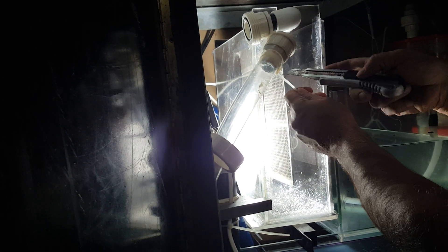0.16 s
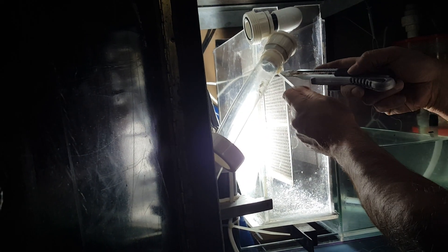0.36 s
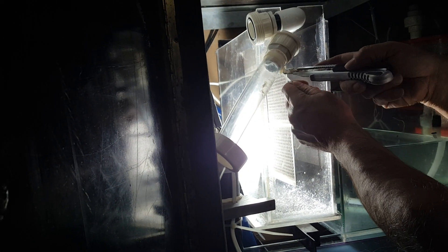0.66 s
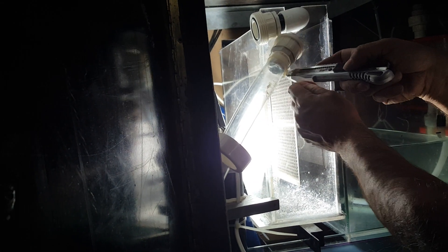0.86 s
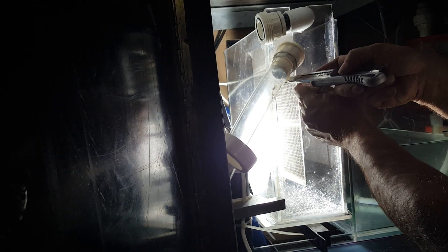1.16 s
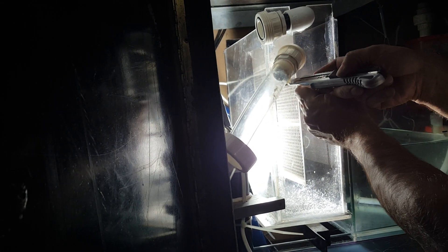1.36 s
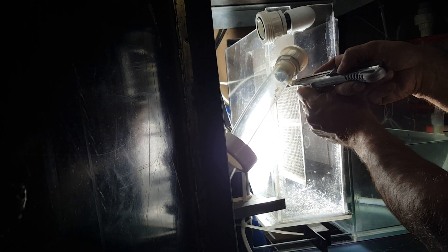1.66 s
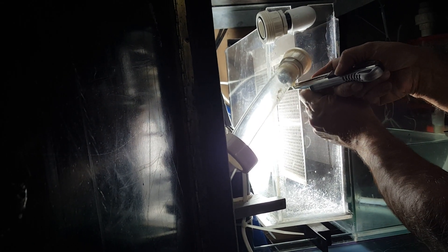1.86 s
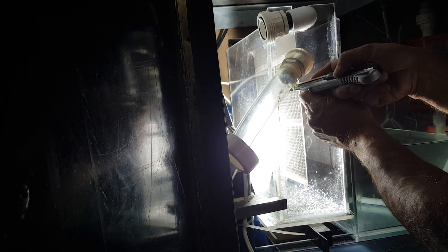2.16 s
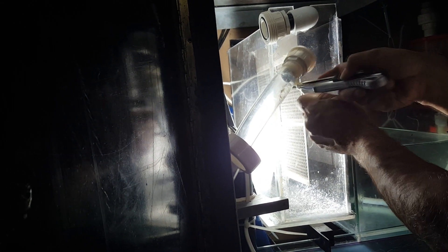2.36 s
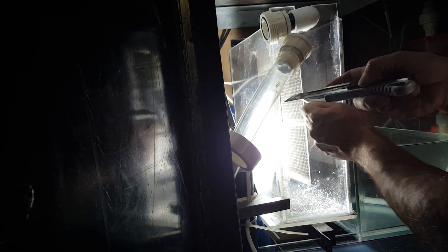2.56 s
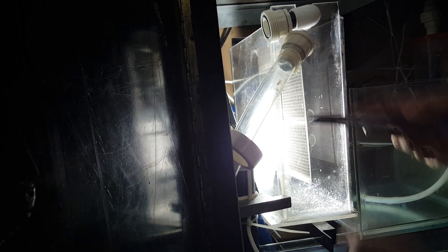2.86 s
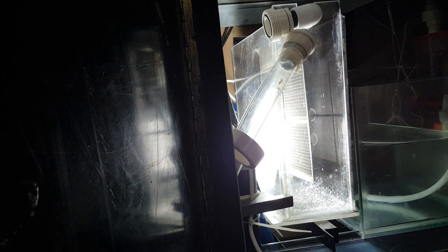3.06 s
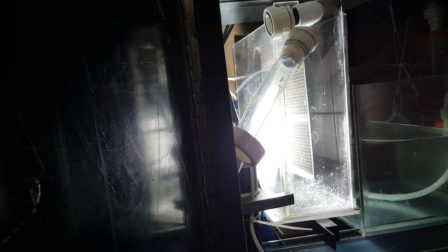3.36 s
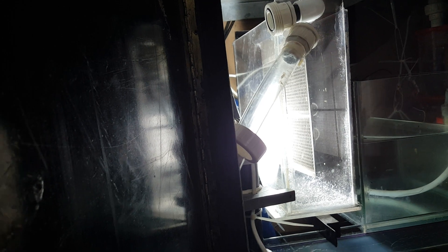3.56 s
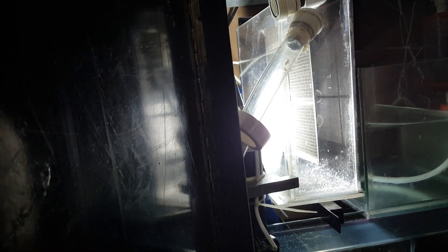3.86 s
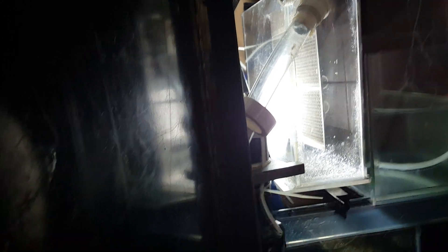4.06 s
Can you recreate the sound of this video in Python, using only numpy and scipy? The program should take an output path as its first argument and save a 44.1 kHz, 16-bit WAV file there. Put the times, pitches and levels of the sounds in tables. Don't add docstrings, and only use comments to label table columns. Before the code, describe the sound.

Steel cutters click several times on a plastic tie, snap through it loudly, then the tool rattles quickly over a steady pump hum.

```python
import sys
import numpy as np
from scipy import signal
from scipy.fft import rfft, irfft, next_fast_len
from scipy.io import wavfile
from scipy.ndimage import uniform_filter1d, map_coordinates

SR = 44100
rng = np.random.default_rng(int(sys.argv[2]) if len(sys.argv) > 2 else 0)


def put_to_file(sound):
    columns = np.atleast_2d(sound).T
    safe = np.clip(columns, -1, 1)
    whole_steps = np.round(safe * 32767)
    wavfile.write(sys.argv[1], SR, whole_steps.astype(np.int16))


def linear_from_db(decibels):
    return 10 ** (np.asarray(decibels, float) / 20)


N = 186047

# centre in Hz, width in Hz, level in dB.
NEAR_MODES = [
    [(7060, 1920, -2.5), (8580, 2000, 0)],
    [(1957, 520, 2), (3070, 1300, -4)],
    [(3437, 1040, 0), (4525, 1490, -2.5)],
    [(6330, 1180, 0)],
    [(10540, 6500, -2), (14040, 4300, 2)],
]
# centre in Hz, width in Hz, level in dB.
FAR_MODES = [
    [(8050, 2100, 0)],
    [(2210, 800, -0.019), (2990, 1000, -0.7)],
    [(3240, 910, -0.2), (5070, 1600, -2)],
    [(6050, 1800, 0)],
    [(10770, 2500, 0), (14450, 2100, 0)],
]
# jaw in dB, its share of heft, blade in dB, its shares of heft and snap.
RATTLE_FOLLOW = (-2.5, 0.43, -0.9, 0.5, 0.4)


def unit(x):
    return x / np.sqrt(np.mean(x ** 2) + 1e-20)


def along(points, hz):
    f, v = np.transpose(points)
    return np.interp(np.log(hz + 1), np.log(f + 1), v)


def wobble(rate_hz):
    knots = rng.standard_normal(int(N * rate_hz / SR) + 4)
    return map_coordinates(knots, [np.arange(N) * rate_hz / SR])


def filtered(x, response):
    n = x.shape[-1]
    m = next_fast_len(n + 4096)
    return irfft(rfft(x, m) * response(np.fft.rfftfreq(m, 1 / SR)), m)[..., :n]


def resonant(modes, order=2, shift=1):
    def response(f):
        one = 0
        for k, (centre_hz, width_hz, db) in enumerate(modes):
            damping = 1j * f * width_hz
            peak = damping / ((shift * centre_hz) ** 2 - f * f + damping)
            one = one + (-1) ** k * linear_from_db(db / order) * peak
        return one ** order / np.sqrt(np.mean(np.abs(one) ** (2 * order)))
    return response


def two_ports(n, share):
    a, b = rng.standard_normal((2, n))
    turn = np.arccos(np.clip(share, -1, 1)) / 2
    common, opposed = np.cos(turn) * a, np.sin(turn) * b
    return np.array([common + opposed, common - opposed])


def add(out, start_s, x):
    part = out[:, round(start_s * SR):][:, :x.shape[1]]
    part += x[:, :part.shape[1]]


def cabinet(x, wet_db, delay_s):
    # frequency in Hz, t60 in seconds.
    decay = [(500, 0.31), (2000, 0.51), (4000, 0.47), (8000, 0.32), (14000, 0.28)]
    hz, t, z = signal.stft(rng.standard_normal((2, SR // 2)), SR, nperseg=256)
    dying = z * linear_from_db(-60 * t / along(decay, hz)[:, None])
    tail = signal.istft(dying, SR, nperseg=256)[1]
    tail = np.pad(tail, ((0, 0), (round(delay_s * SR), 0)))
    return linear_from_db(wet_db) * signal.fftconvolve(x, tail / np.linalg.norm(tail[0]), axes=1)


def rush(spectrum, patchy_db):
    # frequency in Hz, side minus mid in dB.
    side_width = [(60, -27), (110, -18), (200, -18.5), (380, -10), (700, -2), (1290, 0.5), (2380, 2),
                  (4400, -0.5), (8120, 0.5), (15000, 0.5)]
    z = signal.stft(rng.standard_normal((2, N)), nperseg=512)[2]
    field = uniform_filter1d(rng.standard_normal(z.shape[1:]), 5, 0)
    field = uniform_filter1d(field, 10, 1)
    pair = signal.istft(z * linear_from_db(patchy_db * unit(field)), nperseg=512)[1][:, :N]

    def colour(hz):
        return linear_from_db(along(spectrum, hz)) * [hz ** 0, linear_from_db(along(side_width, hz))]
    mid, side = filtered(pair, colour)
    return np.array([mid + side, mid - side]) / np.std(mid)


def machines():
    # frequency in Hz, density in dB per Hz.
    hum_spectrum = [(15, -39), (30, -10), (48, -4), (70, -7.5), (86, -6.5), (107, 2), (162, -6.5),
                    (266, -3.5), (300, -7.5), (350, -10.5), (394, -14), (476, -11.5), (782, -18),
                    (852, -16.5), (1500, -35), (1950, -42), (3300, -120)]
    # frequency in Hz, density in dB per Hz.
    hiss_spectrum = [(600, -27), (1000, -2.5), (1600, -9), (2500, -13.5), (4000, -17.5), (5000, -20.5),
                     (6500, -25), (8300, -22.5), (9300, -32), (12000, -36.5), (15600, -33.5), (16300, -64)]
    # frequency in Hz, level in dB rms.
    motor = [(42, -58.5), (100, -53), (835, -64.5)]
    # time in seconds, level in dB.
    rustle_level = [(0, -69.5), (.3, -80), (2.9, -94), (3.08, -70), (3.3, -67), (3.55, -66.5), (4.22, -76)]
    rustle_spectrum = [(5000, -18), (9000, 0.5), (15700, -11), (16200, -40)]  # Hz, dB
    t = np.arange(N) / SR
    tones = 0
    for hz, db in motor:
        level = linear_from_db(db + 2.5 + 1.3 * wobble(7.02))
        tones = tones + level * np.sin(2 * np.pi * hz * t + 0.9 * wobble(4.89))
    hum = linear_from_db(-42.5 + 0.19 * wobble(4.3)) * rush(hum_spectrum, patchy_db=1.0)
    hiss = linear_from_db(-55.5) * rush(hiss_spectrum, patchy_db=0.9)
    rustle_db = np.interp(t, *np.transpose(rustle_level)) - 2.0
    rustle = linear_from_db(rustle_db) * rush(rustle_spectrum, patchy_db=-7.0)
    return (hum + hiss + rustle + tones) * linear_from_db([[.3], [-.3]])


def thumps():
    # start in seconds, level in dB.
    blows = [(1.2745, -24.5), (1.511, -38.5), (1.404, -43)]
    # frequency in Hz, level in dB, t60 in seconds.
    pipe = [(567, -3, 0.27), (648.5, 1, 0.18), (713, -3, 0.17), (850, -4, 0.089), (1225, -7, 0.077),
            (390, -6.5, 0.05)]
    out, t = np.zeros((2, N)), np.arange(SR // 3) / SR
    port_phase = np.array([[.4], [-.4]])
    for s, db in blows:
        ring = 0
        for hz, level_db, t60_s in pipe:
            ring = ring + linear_from_db(level_db - 60 * t / t60_s) * np.sin(2 * np.pi * hz * t + port_phase)
        hit = linear_from_db(db + np.array([[2.6], [-2.6]])) * ring * (1 - np.exp(-t / 0.0012))
        add(out, s, hit)
        add(out, s, cabinet(hit, wet_db=-7, delay_s=0.005))
    return out


def knocks():
    # start in seconds, level in dB, t60 in seconds.
    bumps = [
        [(.514, -37.5, .06)],
        [(.355, -41, .03), (1.276, -36, .04), (1.513, -39, .03), (1.82, -38, .05), (2.46, -29, .08),
         (2.521, -31, .07), (3.68, -41, .04), (3.75, -42, .04), (3.822, -39, .04), (3.864, -43, .03),
         (4.206, -38, .03)],
    ]
    # centre in Hz, width in Hz, level in dB.
    cavities = [
        [(528, 17, 14), (245, 53, -14)],
        [(710, 360, -3.5), (1020, 350, -0.5), (1595, 360, -0.4)],
    ]
    out, t = np.zeros((2, N)), np.arange(SR // 3) / SR
    for blows, modes in zip(bumps, cavities):
        for s, db, t60_s in blows:
            decay = linear_from_db(-60 * t / t60_s) * (1 - np.exp(-t / 0.00015))
            blow = two_ports(len(t), share=0.81) * decay
            ring = linear_from_db(db + np.array([[2.5], [-2.5]])) * filtered(blow, resonant(modes, order=1))
            add(out, s, ring)
            add(out, s, cabinet(ring, wet_db=-4, delay_s=0.00492))
    return out


def tool_colour(envelope, levels_db, groups, attack):
    likeness = [0.25, -0.52, -0.21, 0.14, 0.064]
    out = 0
    for db, modes, share in zip(levels_db, groups, likeness):
        detune = np.exp(rng.normal(0, 0.015))
        noise = envelope * two_ports(envelope.shape[-1], share)
        ring = filtered(noise, resonant(modes, shift=detune))
        out = out + linear_from_db(db) * ring / np.std(ring[:, :attack].mean(0))
    return out


def slides():
    # start in seconds, attack in seconds, hold in seconds, level in dB, heft in dB.
    pulls = [(1.809, .002, 0.061, -30.5, -12.5), (4.137, .007, .024, -34, -8),
             (4.203, 0.0088, 0.037, -38, 1.5)]
    # Jaw, blade and edge levels under the ring, in dB.
    rest_db = (-8.5, -4, -7.5)
    let_go_db_per_s, let_go_s, ring_sag_db_per_s = 620, .04, 58
    out = np.zeros((2, N))
    for s, attack_s, hold_s, db, heft_db in pulls:
        t = np.arange(0, attack_s + hold_s + let_go_s, 1 / SR)
        outside_s = np.clip(attack_s - t, 0, 1) + np.clip(t - attack_s - hold_s, 0, 1)
        press_db = db - let_go_db_per_s * outside_s
        levels_db = [press_db - ring_sag_db_per_s * t]
        levels_db += [press_db + r for r in (heft_db, *rest_db)]
        slips = unit(linear_from_db(3.1 * wobble(420)[:len(t)]))
        fade = np.clip(np.minimum(t, t[-1] - t) / 0.0016, 0, 1)
        add(out, s, fade * tool_colour(slips, np.array(levels_db) - 3.0, NEAR_MODES, attack=len(t)))
    return out


def squeaks():
    # start in seconds, hold in seconds, first pitch in Hz, last pitch in Hz, level in dB.
    partials = [(1.807, .066, 2120, 1940, -40.5), (1.84, .036, 3960, 3860, -43),
                (1.834, 0.041, 6030, 5650, -44), (4.14, .028, 8250, 7530, -40.5),
                (4.141, 0.019, 10900, 10700, -50), (4.143, .025, 13900, 13700, -54)]
    swell_db, dies_db_per_s, tail_s = 5, 450, .05
    out = np.zeros((2, N))
    for s, hold_s, first_hz, last_hz, db in partials:
        t = np.arange(0, hold_s + tail_s, 1 / SR)
        done = np.clip(t / hold_s, 0, 1)
        cycles = np.cumsum(first_hz + (last_hz - first_hz) * done) / SR
        phase = 2 * np.pi * cycles + [[0], [1.6]] + 1.6 * wobble(153)[:len(t)]
        level_db = db - swell_db * (1 - done) - dies_db_per_s * np.clip(t - hold_s, 0, 1)
        level_db = level_db + 7.5 + 3.7 * wobble(140)[:len(t)]
        add(out, s, np.clip(t / 0.0028, 0, 1) * linear_from_db(level_db) * np.sin(phase))
    return out


def scrapes():
    out = slides() + squeaks()
    return out + cabinet(out, wet_db=-11.5, delay_s=0.0019)[:, :N]


def steel(t):
    # frequency in Hz, level in dB, t60 in seconds.
    jaw_modes = [(3200, -3, 0.28), (3280, 4, 0.29), (3780, -15, 0.4), (3770, 6.5, 0.5), (4450, -9, .3),
                 (4600, -12, .3), (5530, -10, .3), (6440, -7, .25), (7300, -19, 0.15), (7610, -11, 0.13),
                 (7900, -8, .25), (8400, -5, .14), (10610, -12, .22), (12140, -17, .13)]
    scatter_db, blur_rad = 5.5, 0.69
    hz, db, t60_s = np.transpose(jaw_modes)[:, :, None, None]
    paths = 2 * len(jaw_modes)
    knots = rng.standard_normal((paths, 40)).ravel()
    drift = map_coordinates(knots, [40 * np.arange(paths)[:, None] + 60 * t], order=1)
    level_db = db + scatter_db * rng.standard_normal(db.shape) - 60 * t / t60_s
    phase = 2 * np.pi * hz * t + 3 * blur_rad * drift.reshape(-1, 2, len(t))
    return np.sum(linear_from_db(level_db) * np.sin(phase), axis=0) * np.clip(t / 0.0011, 0, 1)


def contacts(rows, follow, groups, rise_s, t60_s, crack_db, ring_db, rest_db, wet_db, pan_db, steel_db):
    palm_s, palm_share = 0.000696, 0.51
    out, t = np.zeros((2, N)), np.arange(SR // 5) / SR
    envelope = linear_from_db(-60 * t / t60_s) + linear_from_db(crack_db - 60 * t / 0.0044)
    envelope = envelope * (1 - np.exp(-t / rise_s))
    jaw_db, jaw_heft, blade_db, blade_heft, blade_snap = follow
    for s, db, heft_db, snap_db in rows:
        jaw_rel_db = jaw_db + jaw_heft * heft_db
        blade_rel_db = blade_db + blade_heft * heft_db + blade_snap * snap_db
        rel_db = np.array([heft_db, jaw_rel_db, blade_rel_db, snap_db])
        levels_db = db + np.r_[ring_db, rest_db + rel_db]
        delay_s = palm_s * np.exp(rng.normal(0, 0.4035))

        def palm(hz):
            echo = palm_share * np.exp(-2j * np.pi * hz * delay_s)
            return (1 + echo) / np.hypot(1, palm_share)
        hit = filtered(tool_colour(envelope, levels_db, groups, attack=SR // 160), palm)
        ring = linear_from_db(db + steel_db + .7 * jaw_rel_db) * steel(t) * (1 - t / t[-1])
        add(out, s - .0003, (hit + ring) * linear_from_db([[pan_db], [-pan_db]]))
        add(out, s, cabinet(hit, wet_db, delay_s=.004))
    return out


def taps():
    # start in seconds, ring peak in dB, heft (body over ring) in dB, snap (edge over ring) in dB.
    rows = [(4.13, -26, 3.9, -20.5), (4.2056, -32, 10.7, -20.5)]
    follow = (-8, 1, -12, 0.1, .2)
    # centre in Hz, width in Hz, level in dB.
    bench_modes = [
        [(8160, 1200, 0)],
        [(2310, 560, 10), (3020, 1100, -8)],
        [(3360, 720, 4), (4570, 1700, -4)],
        [(6240, 1600, 0)],
        [(11200, 2500, 0), (14500, 3500, 0)],
    ]
    return contacts(rows, follow, bench_modes, rise_s=0.00034, t60_s=0.02, crack_db=7, ring_db=-10.0,
                    rest_db=-3, wet_db=-15, pan_db=0.9, steel_db=-40)


def laid_down():
    # start in seconds, ring peak in dB, heft in dB, snap in dB.
    rows = [(3.3688, -18, -16.5, -9)]
    return contacts(rows, RATTLE_FOLLOW, FAR_MODES, rise_s=0.00028, t60_s=0.016, crack_db=8, ring_db=-8.5,
                    rest_db=-4.5, wet_db=-12.5, pan_db=-1.5, steel_db=-48)


def rattle():
    # start in seconds, ring peak in dB, heft in dB, snap in dB.
    rows = [(3.6607, -18.5, -15.5, -6), (3.68, -19.5, -9.5, -1), (3.693, -20, -11, -7),
            (3.7095, -17.5, -17, -9), (3.7309, -16.5, -16, -9), (3.751, -18, -13, -7),
            (3.7748, -17, -11, -8), (3.8074, -18, -10, -5), (3.8224, -16, -12.5, -8),
            (3.864, -16.5, -9.5, -6.5), (3.9121, -15.5, -10, -10), (4.039, -14.5, -18.5, -9)]
    return contacts(rows, RATTLE_FOLLOW, FAR_MODES, rise_s=0.00035, t60_s=0.027, crack_db=5, ring_db=-8.5,
                    rest_db=-4.5, wet_db=-13.0, pan_db=0.5, steel_db=-37)


def brushes():
    # start in seconds, ring peak in dB, heft in dB, snap in dB.
    rows = [(0.0317, -54, 5, -15), (0.2433, -59, 2, -15), (0.4165, -33.5, -7.5, -13),
            (0.5263, -34, -6, -9.5), (1.7315, -21.5, -19, -17), (1.7534, -27, -23, -16),
            (2.3945, -54, 8.5, -18), (2.8583, -65, 15.5, -15), (2.9416, -51.5, 3.5, -19),
            (3.0414, -43.5, 5, -20), (3.2815, -40.5, -2, -14), (3.5662, -50.5, -2, -19),
            (3.6151, -50.5, 5.5, -17)]
    # start in seconds, ring peak in dB, heft in dB, snap
    # in dB.
    more_brushes = [(4, -51, -6, -6), (.088, -56, -24, -2.5), (1.807, -31.5, -8.5, -14),
                    (1.696, -60, 12.5, -15), (4.178, -52, 9, -15)]
    follow = (1, 0.44, -4, 0.1, 0.23)
    return contacts(rows + more_brushes, follow, NEAR_MODES, rise_s=0.0018, t60_s=.05, crack_db=-5, ring_db=-11.5,
                    rest_db=-6.5, wet_db=-11, pan_db=0.8, steel_db=-33)


def cut():
    # start in seconds, ring peak in dB, heft in dB, snap in dB.
    rows = [(2.4595, -12, -13, -9.5)]
    follow = (3.5, 0.63, -2.5, .4, 0.3)
    return contacts(rows, follow, NEAR_MODES, rise_s=0.00018, t60_s=.13, crack_db=7.5, ring_db=-8.5,
                    rest_db=-3, wet_db=-8.5, pan_db=1.0, steel_db=-27)


def snips():
    # start in seconds, ring peak in dB, heft in dB, snap in dB.
    rows = [(0.355, -32, -1.5, -3.5), (1.078, -16.5, -18, -16), (1.1214, -19, -18.5, -17.5),
            (1.2839, -18.5, -16.5, -15), (1.4037, -18, -31, -16.5), (1.5131, -13, -23, -19),
            (1.8202, -25, -20, -12), (2.9582, -45, 8, -23)]
    follow = (7.36, .66, 8.6, 0.52, 0.65)
    return contacts(rows, follow, NEAR_MODES, rise_s=0.00011, t60_s=0.043, crack_db=7, ring_db=-10.0,
                    rest_db=-5.0, wet_db=-12.5, pan_db=1.34, steel_db=-28.5)


def scene():
    room = machines() + thumps() + knocks()
    bench = taps() + laid_down() + rattle()
    return room + bench + scrapes() + brushes() + cut() + snips()


def roll_off(x):
    return signal.sosfilt(signal.butter(12, 17150, fs=SR, output="sos"), x)


def record(dry):
    def microphone(hz):
        return 1 / (1 + (36 / (hz + 1)) ** 8) / (1 + (hz / 16200) ** 60)
    return roll_off(filtered(dry, microphone))


dry = scene()
out = record(dry)
put_to_file(out)
```